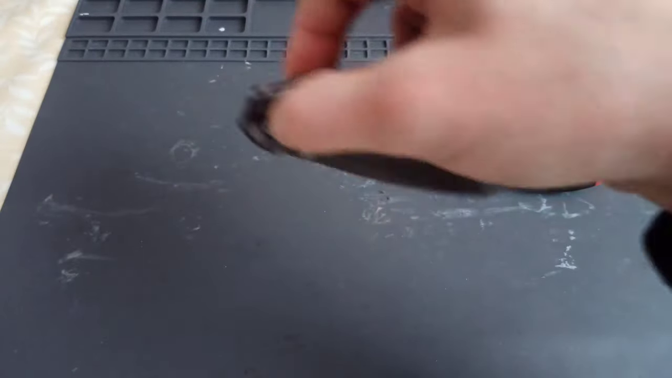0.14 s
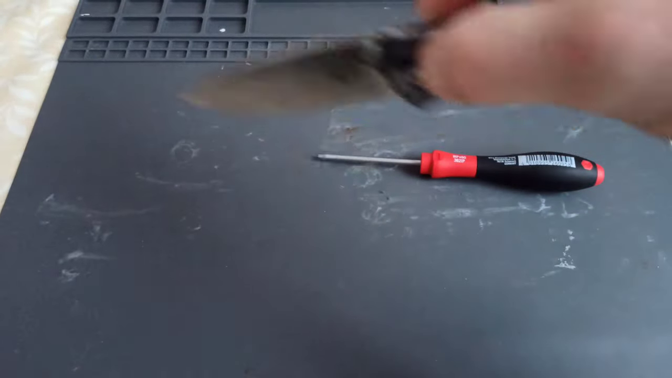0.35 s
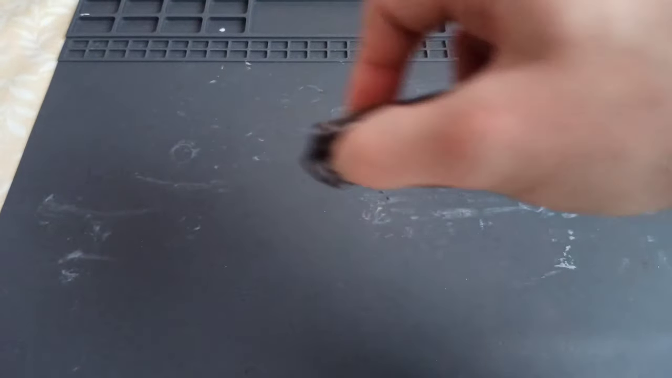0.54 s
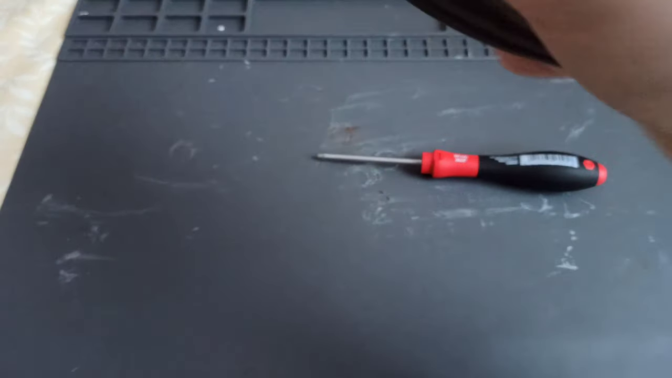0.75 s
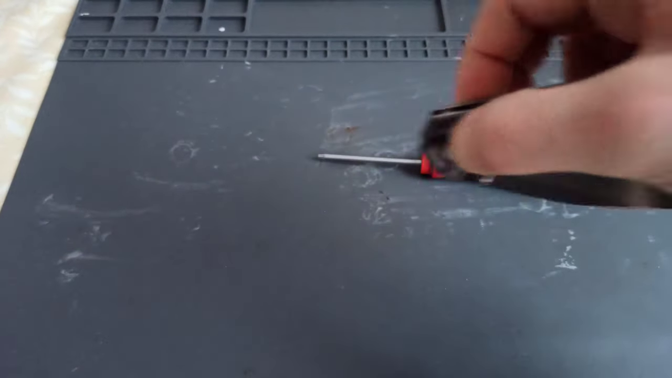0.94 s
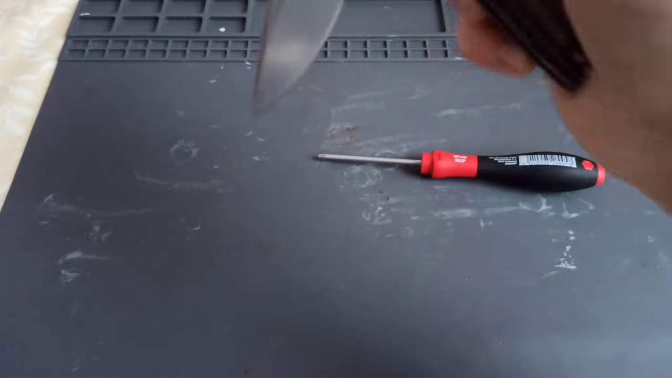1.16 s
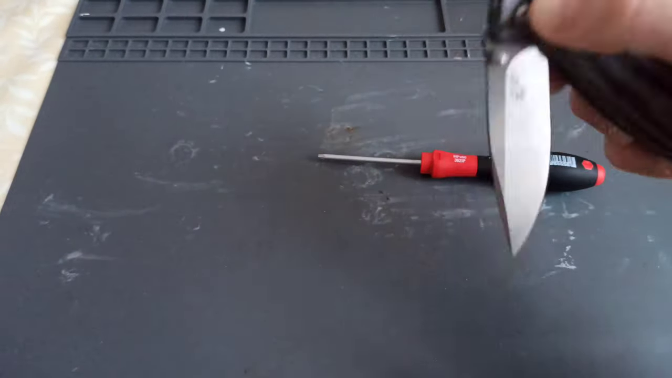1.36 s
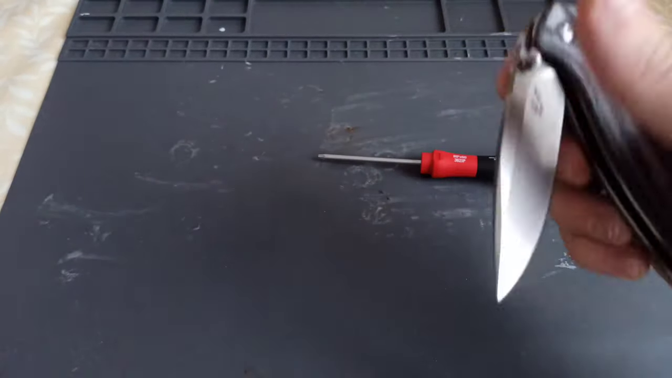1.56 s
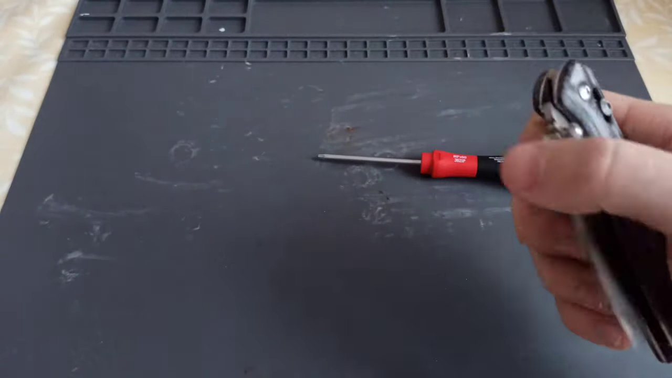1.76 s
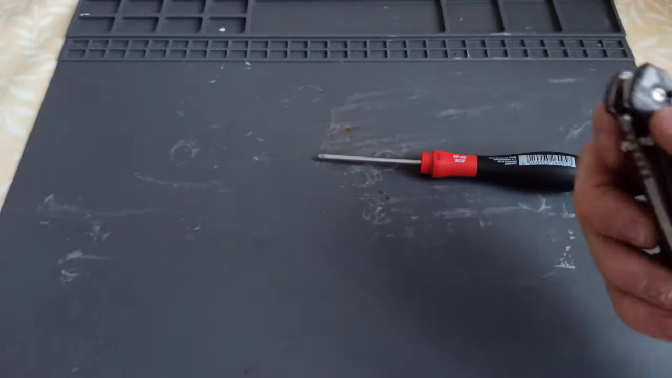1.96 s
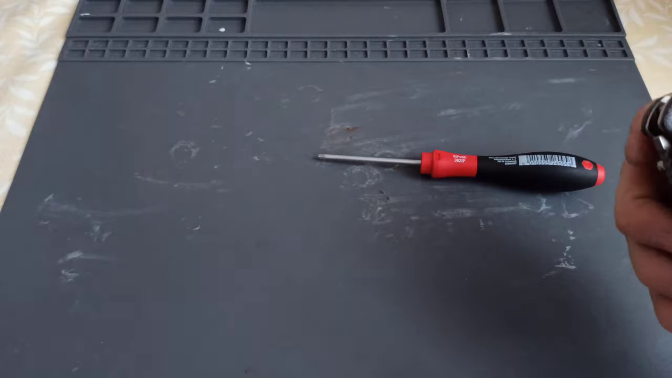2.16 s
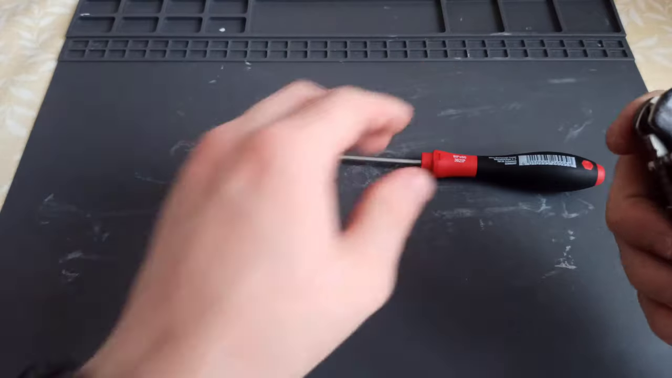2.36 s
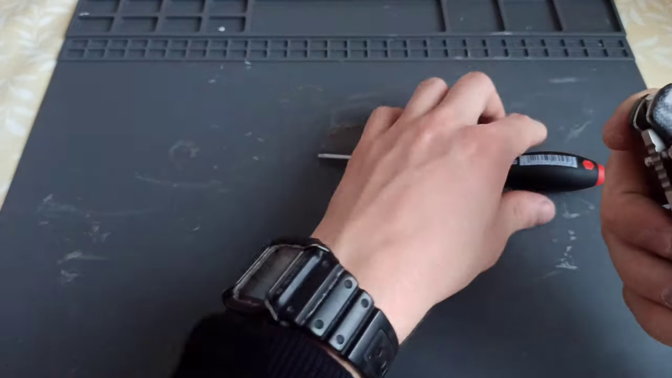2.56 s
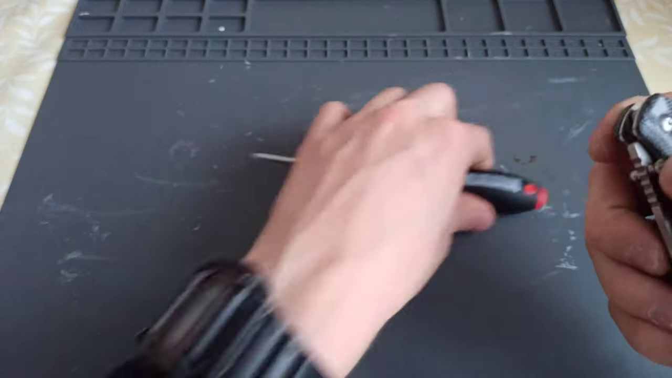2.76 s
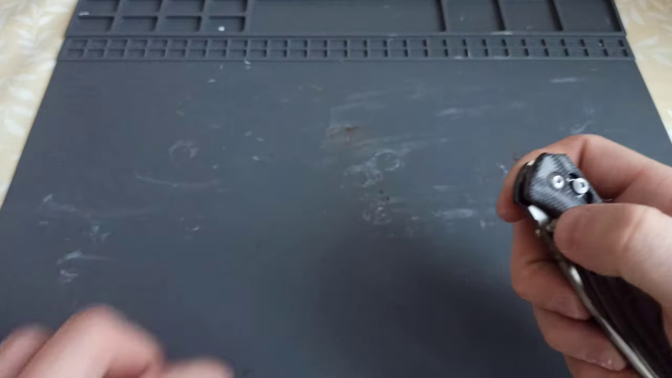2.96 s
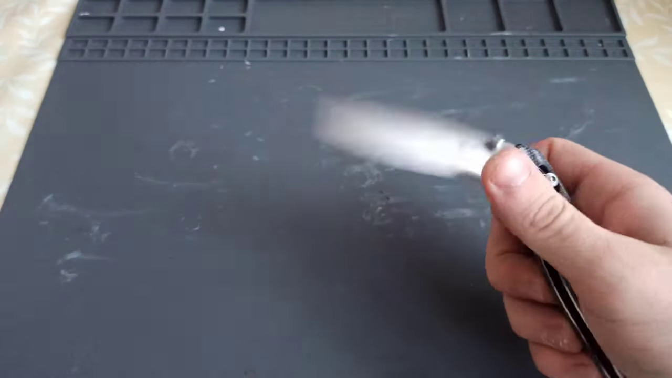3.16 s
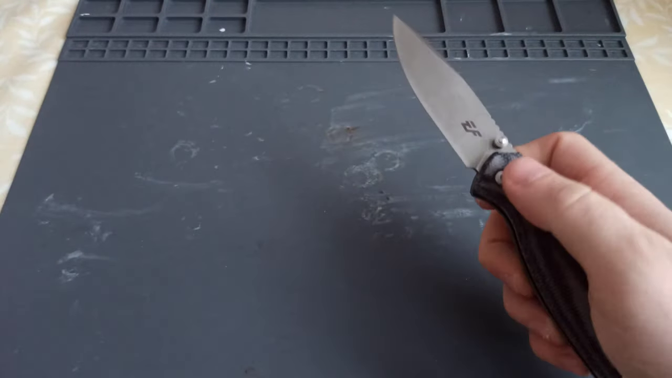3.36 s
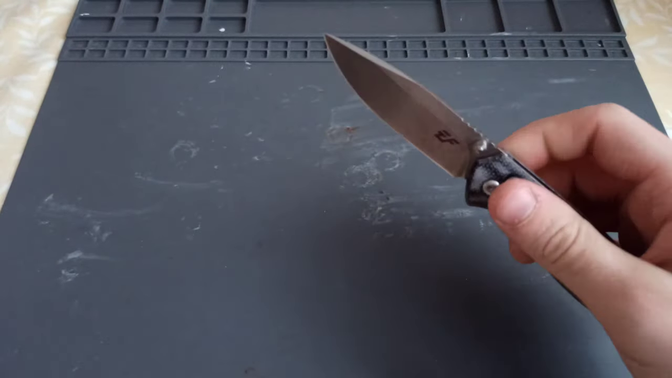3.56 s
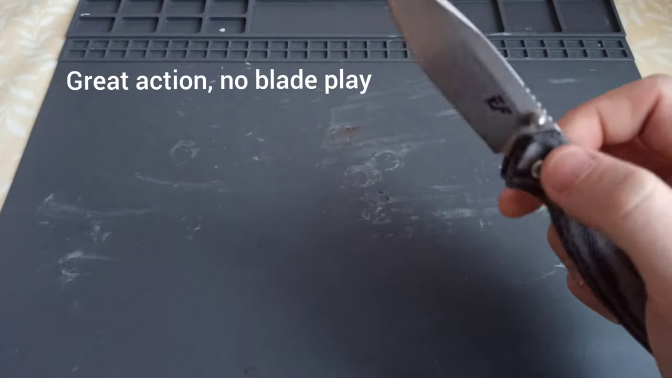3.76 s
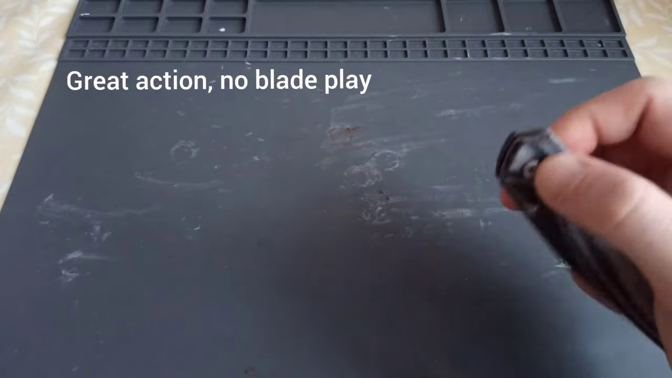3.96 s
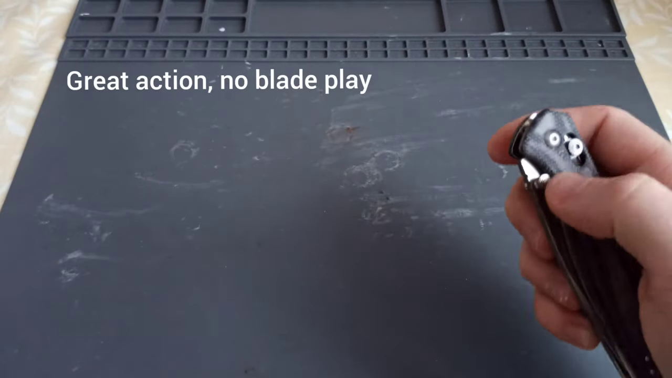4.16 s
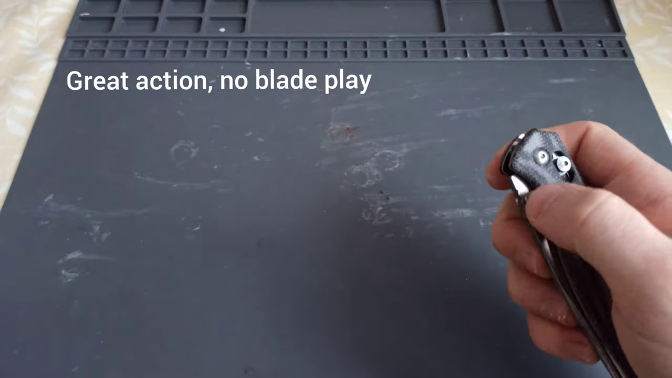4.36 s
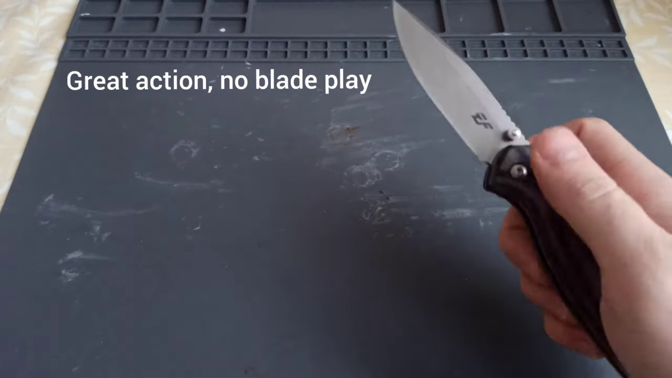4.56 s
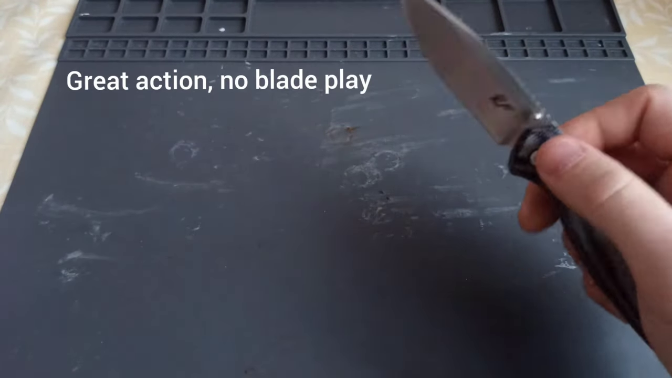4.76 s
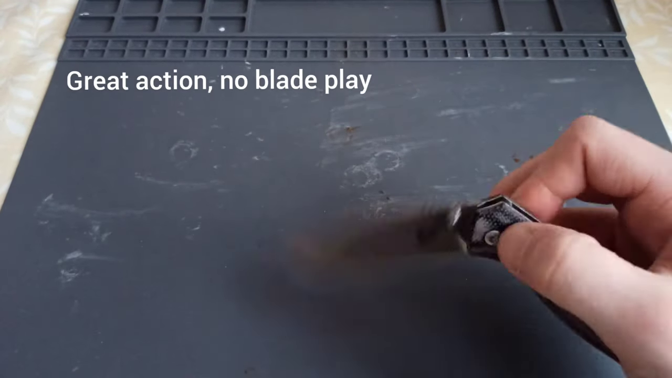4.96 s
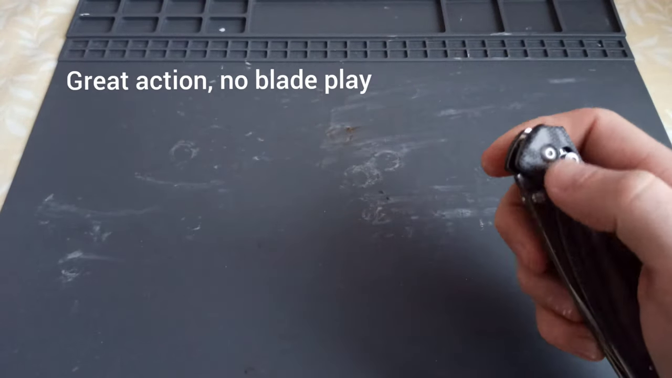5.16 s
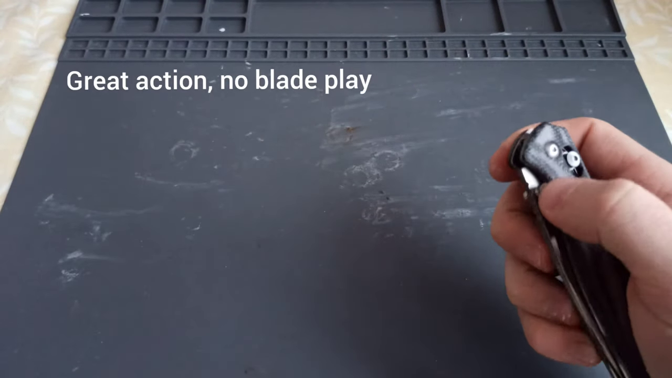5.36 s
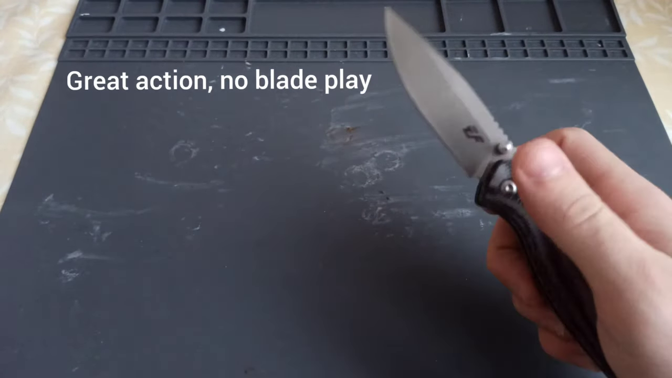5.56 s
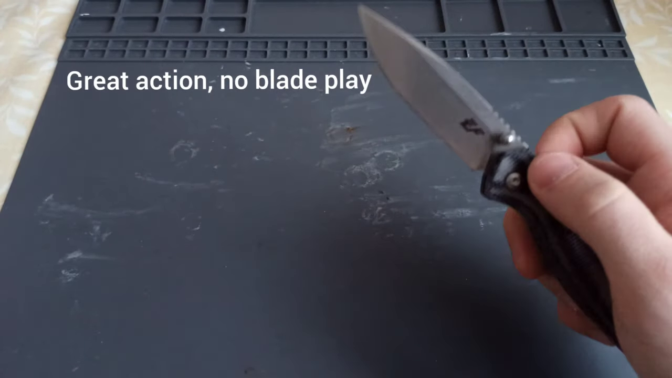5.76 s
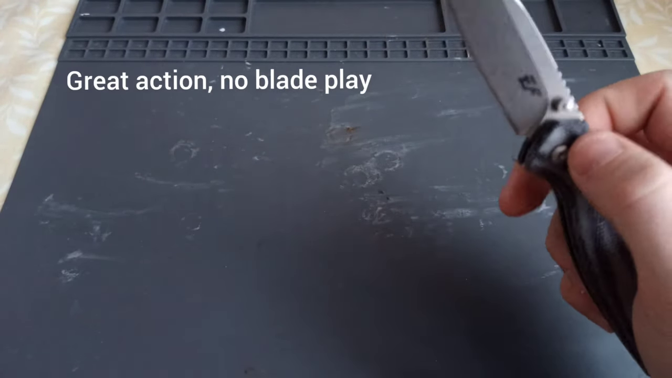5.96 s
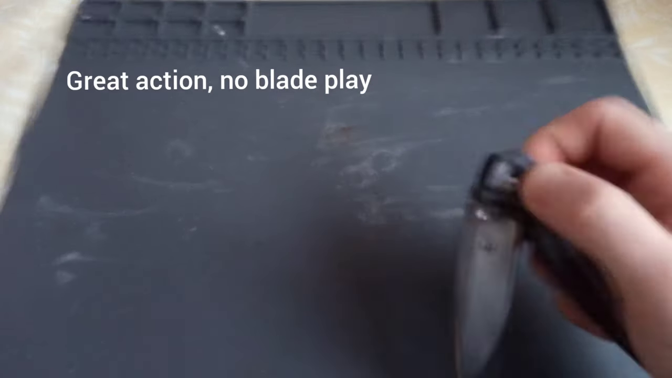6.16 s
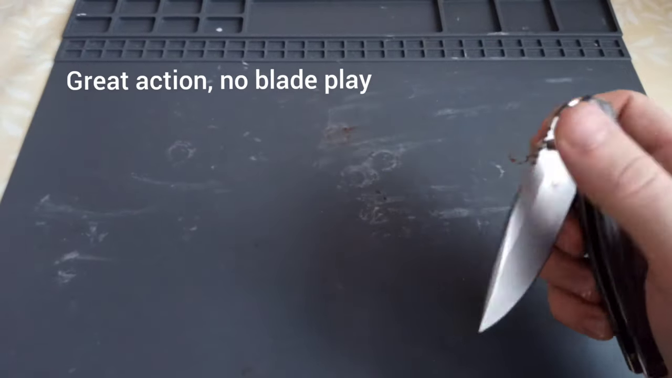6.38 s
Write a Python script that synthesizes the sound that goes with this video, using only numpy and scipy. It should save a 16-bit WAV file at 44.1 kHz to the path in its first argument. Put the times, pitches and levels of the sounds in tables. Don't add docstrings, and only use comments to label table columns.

```python
import sys
import numpy as np
from scipy import signal
from scipy.fft import rfft, irfft
from scipy.io import wavfile
from scipy.ndimage import uniform_filter1d

SR = 44100
rng = np.random.default_rng(int(sys.argv[2]) if len(sys.argv) > 2 else 0)


def store_pcm(level_fs):
    pcm = np.round(np.clip(level_fs, -1, 1) * 32767).astype(np.int16)
    wavfile.write(sys.argv[1], SR, np.atleast_2d(pcm).T)


def voltage_ratio(decibels):
    exponent = np.asarray(decibels, float) / 20
    return 10 ** exponent


N = 283122


def evened(x):
    return x / np.sqrt(np.mean(x ** 2) + 1e-20)


def peaked(x):
    return x / abs(x).max()


def read(points, hz):
    f, value = np.transpose(points)
    return np.interp(np.log(hz + 1), np.log(f + 1), value)


def add(mix, start_s, sound):
    at = round(start_s * SR)
    sound = sound[max(-at, 0):]
    part = mix[max(at, 0):][:len(sound)]
    part += sound[:len(part)]


def coloured(x, points):
    gain = voltage_ratio(read(points, np.fft.rfftfreq(len(x), 1 / SR)))
    return irfft(rfft(x) * gain, len(x))


def resonate(x, hz, width_hz):
    b, a = signal.iirpeak(min(hz, .49 * SR), hz / width_hz, SR)
    return signal.lfilter(b, a, x)


def ring(modes, t, spread=.015):
    hz, db, t60_s = np.transpose(modes)[:, :, None]
    hz = hz * (1 + spread * rng.uniform(-0.49, 1, hz.shape))
    decay = voltage_ratio(db - 60 * t / np.maximum(t60_s, .003))
    return (decay * np.sin(2 * np.pi * hz * t)).sum(0)


# mode in Hz, level in dB, t60 in s.
STEEL_MODES = [(4355, -9, .01), (5173, -6, .008), (5755, -6, .01), (6260, -2, .018), (6800, -6, .01),
               (7520, -3, .018), (8130, -8, .01)]
# mode in Hz, level in dB, t60 in s.
CLOSED_HANDLE_MODES = [(280, -15, .012), (870, -1, .024), (2030, -4, .024)]
# mode in Hz, level in dB, t60 in s.
OPEN_HANDLE_MODES = [(880, -2, .022), (1030, -2, .016), (1280, 0.5, 0.014), (1615, -19, .07),
                     (1700, -4, .012)]
# mode in Hz, level in dB, t60 in s.
BLADE_MODES = [(2370, -15, 0.0034), (3200, -5.5, 0.0053), (3740, 0, 0.024)]


def click(peak_db, lock_hz, handle_db, blade_db, sizzle_db, contact_s, lock_ring_db, wet_db,
          out=0, rattle_db=-40, clack_hz=4370, blade_ring_db=-4):
    t = np.arange(4000) / SR
    ragged = rng.standard_normal(len(t)) * (t / contact_s) * np.exp(-t / contact_s)
    blows = np.array([ragged, np.linalg.norm(ragged) * (t == 0)])

    def struck(modes):
        return signal.fftconvolve(blows, modes[None], axes=1)[:, :len(t)]

    out = np.clip(out, 0, 1)
    closed_knock = ring(CLOSED_HANDLE_MODES, t, spread=0.04)
    handle = (1 - out) * closed_knock + out * ring(OPEN_HANDLE_MODES, t, spread=0.026)
    parts = [(0, resonate(resonate(blows, lock_hz, 1500), lock_hz, 4500)),
             (lock_ring_db, struck(ring(STEEL_MODES, t))),
             (blade_db + blade_ring_db, struck(ring(BLADE_MODES, t, spread=0.12))),
             (blade_db, resonate(resonate(blows, clack_hz, 4700), clack_hz, 4600)),
             (handle_db + 5.5, np.array([handle, handle]) * np.minimum(t / 0.003, 1)),
             (sizzle_db + 4, resonate(resonate(blows, 10000, 4900), 13000, 8000))]
    direct, sent = sum(voltage_ratio(db) * part / np.linalg.norm(part, axis=1)[:, None] for db, part in parts)
    sent = sent - .7 * resonate(sent, 870, 300)
    b, a = signal.butter(1, 250, "high", fs=SR)
    direct, sent = signal.lfilter(b, a, [direct, sent])
    sent = sent - 0.4 * resonate(sent, 990, 2200)

    hits = rng.standard_normal(len(t)) * (rng.random(len(t)) < 900 / SR)
    chatter = hits * np.exp(-((t - .03) / 0.053) ** 2) * np.cos(np.pi / 2 * t / t[-1])
    chatter *= voltage_ratio(rattle_db) / np.linalg.norm(chatter)
    sound = room(direct, wet_db, sent)
    add(sound, 0, signal.fftconvolve(chatter, sent))
    return voltage_ratio(peak_db - 1.0) / abs(direct).max() * sound


# start in seconds, blow in dB, brightest ring in Hz, blade clack in dB, sizzle in dB.
SHAKES = [
    (0.3747, -12, 6350, -10, -10.5),
    (0.8186, -12, 8090, -9, -17.5),
    (0.9764, -9.5, 6170, -11.5, -11.5),
]
# start in seconds, blow in dB, brightest ring in Hz, blade clack in dB, sizzle in dB.
OPENS = [
    (3.255, -7, 6430, -11.5, -28),
    (4.5444, -9, 7000, -10, -19),
    (5.5578, -9, 6380, -6.5, -30),
]
# start in seconds, blow in dB, brightest ring in Hz, blade clack in dB, sizzle in dB.
SHUTS = [
    (1.8456, -10, 6600, -32.5, -32),
    (4.0143, -10.5, 7340, -23, -48),
    (5.1135, -12.5, 6850, -28.5, -25),
]


def snaps(mix):
    shake = dict(handle_db=-26, wet_db=-10, out=-6.8, rattle_db=-25, contact_s=.001,
                 clack_hz=3500, blade_ring_db=-10.5, lock_ring_db=-1.5)
    opened = dict(handle_db=-16, wet_db=-4.5, out=2, rattle_db=-18.5, contact_s=.001, lock_ring_db=-2)
    shut = dict(handle_db=-19.5, wet_db=-9.5, out=0.08, rattle_db=-18.5, contact_s=.00145, lock_ring_db=-2)
    for rows, grip in [(SHAKES, shake), (OPENS, opened), (SHUTS, shut)]:
        for s, db, hz, blade_db, sizzle_db in rows:
            add(mix, s, click(db, hz, blade_db=blade_db, sizzle_db=sizzle_db, **grip))


# start in seconds, blow in dB, blade clack in dB.
BOUNCES = [
    (1.8607, -13.5, -0.5),
    (1.87, -21, 1.5),
    (4.0438, -23, -16),
    (4.047, -35, -19),
    (5.5632, -50.5, -2),
]


def bounces(mix):
    for s, db, blade_db in BOUNCES:
        add(mix, s, click(db, 6500, -19.5, blade_db, -19.5, contact_s=0.0011, lock_ring_db=-11, wet_db=-11))


# start in seconds, blow in dB, brightest ring in Hz, blade clack in dB, sizzle in dB.
TICKS = [(0.2875, -46, 7160, -28, -9.5), (0.6561, -23.5, 6570, -18, -5), (2.025, -31.5, 7630, -37, -9),
         (3.1803, -36.5, 6150, 4.5, -17), (3.9336, -29, 6850, -43, -21), (3.9922, -20.5, 7100, -47.5, -11),
         (4.4745, -32, 7000, -1.5, -18), (4.956, -24, 5740, -34.5, -39), (5.009, -33.5, 6730, -8.5, -38),
         (5.0479, -36, 7900, -12.5, -31), (5.0789, -34, 6160, -10, -15), (5.4753, -28.5, 6540, 0.5, -19),
         (6.06, -26.5, 6600, -12.5, -42), (6.12, -42, 7500, -15, -18), (6.1709, -14, 7610, -14.5, -9.5)]


def ticks(mix):
    for s, db, hz, blade_db, sizzle_db in TICKS:
        add(mix, s, click(db, hz, -39.5, blade_db, sizzle_db, contact_s=.0006, lock_ring_db=-8.5, wet_db=-9.5))


# start in seconds, blow in dB, blade clack in dB.
EARLIER = [
    (-0.057, -16.5, -3),
]
# start in seconds, blow in dB, blade clack in dB.
FIDGETS = [(0.0746, -52, -6), (1.211, -55, -8), (1.242, -43.5, -34), (1.2599, -56, -21), (1.4385, -56, -14),
           (1.6416, -54, -5), (2.0355, -43, -3), (3.838, -54, -11.5), (3.884, -50, -23), (4.2471, -60, 1),
           (4.292, -61, -3.5), (4.44, -57, 3), (6.205, -35.5, 2.5)]
# start in seconds, blow in dB, blade clack in dB.
LEADS = [(.652, -31, -47), (.9537, -33.5, -3.5), (1.837, -24, -14), (3.175, -57.5, 9), (3.9185, -51.5, 0),
         (3.93, -40, -35), (4.009, -28, -10), (4.9447, -46, 1), (5.108, -22, -15), (5.462, -40, 7),
         (5.4697, -29.5, -1), (6.0432, -43, -2)]


def light_touches(mix):
    for rows, lock_hz, handle_db, sizzle_db in [(EARLIER, 6900, -17.5, -28.5), (FIDGETS, 6900, -17.5, -28.5),
                                                (LEADS, 7130, -33, -22.5)]:
        for s, db, blade_db in rows:
            add(mix, s, click(db, lock_hz, handle_db, blade_db, sizzle_db,
                              contact_s=.0006, lock_ring_db=-20, wet_db=-5.5))


# start in seconds, length in seconds, first squeal in dB, top squeal in dB.
PIVOTINGS = [
    (3.184, 0.08, -53, -41.5),
    (4.476, 0.074, -56.5, -41),
    (5.481, 0.09, -38.5, -43),
]
# centre in Hz, width in Hz, level in dB.
PIVOT_SQUEAL = [(2400, 160, 2), (3250, 420, 3), (3830, 1800, -1.5)]
# centre in Hz, width in Hz, level in dB.
PIVOT_HISS = [(6600, 800, 0.5), (7660, 850, -1), (13500, 3000, -10.5)]


def pivotings(mix):
    rise_s, fall_db_per_s = .019, 499
    ramp_s, ramp_db = 0.014, 7
    for s, length_s, first_db, top_db in PIVOTINGS:
        t = np.arange(0, length_s, 1 / SR)
        ramp_at_s = length_s - ramp_s
        low_db = top_db - fall_db_per_s * (ramp_at_s - rise_s)
        squeal_db = np.interp(t, [0, rise_s, ramp_at_s, length_s], [first_db, top_db, low_db, low_db + ramp_db])
        hiss_db = np.interp(t, [rise_s, length_s], [-5, 9])
        grain_db = 3.5 * evened(uniform_filter1d(rng.standard_normal(len(t)), 45))
        rub = rng.standard_normal(len(t)) * voltage_ratio(grain_db)
        squeal = sum(voltage_ratio(db) * evened(resonate(resonate(rub, hz, width_hz), hz, 3 * width_hz))
                     for hz, width_hz, db in PIVOT_SQUEAL)
        hiss = sum(voltage_ratio(db) * evened(resonate(rub, hz, width_hz)) for hz, width_hz, db in PIVOT_HISS)
        sound = voltage_ratio(squeal_db) * (evened(squeal) + voltage_ratio(hiss_db + 0.5) * evened(hiss))
        add(mix, s, room(sound * signal.windows.tukey(len(t), .15), -13.5))


# start in seconds, level in dB, pitch in Hz, length in seconds.
SQUEAKS = [
    (3.931, -53, 2330, .013),
    (5.078, -59, 2300, .03),
]


def squeaks(mix):
    for s, db, hz, length_s in SQUEAKS:
        noise = rng.standard_normal(round(length_s * SR))
        rub = resonate(resonate(noise, hz, 300), hz, 500)
        add(mix, s, voltage_ratio(db) * room(evened(rub) * signal.windows.tukey(len(rub), .6), -12))


# frequency in Hz, level in dB.
DULL_COLOUR = [(1200, -20.5), (2200, -2.5), (3200, -4), (4500, -17), (8000, -34.5)]


def rubbing(strokes, colour, grain_db, soft):
    grain = voltage_ratio(grain_db * evened(uniform_filter1d(rng.standard_normal(N), 200)))
    fits = voltage_ratio(0.83 * evened(uniform_filter1d(rng.standard_normal(N), 1800)))
    noise = evened(fits * grain) * rng.standard_normal((2, N))
    bright = evened(coloured(noise[0], colour))
    dull = evened(coloured(noise[1], DULL_COLOUR))
    bright_level, dull_level = np.zeros((2, N))
    for s, length_s, db, dull_db in strokes:
        swell = voltage_ratio(db) * signal.windows.tukey(round(length_s * SR), soft)
        add(bright_level, s, swell)
        add(dull_level, s, voltage_ratio(dull_db) * swell)
    return bright_level * bright + dull_level * dull


# start in seconds, length in seconds, level in dB, duller rub in dB.
FINGER_STROKES = [(.075, 0.013, -59, -12), (.09, 0.14, -78, -15), (.27, .1, -70, -19),
                  (1.14, 0.14, -69.5, -3), (1.23, 0.19, -63.5, -28), (1.43, .18, -65, -29),
                  (1.56, 0.24, -64.5, -0.5), (1.77, 0.16, -60, 1), (2.18, 0.12, -64.5, -9),
                  (2.3, 0.31, -76.5, -7.5), (2.63, .22, -71, -7), (2.89, 0.27, -74.5, -7.5),
                  (3.14, 0.057, -66.5, 4.5), (3.42, 0.18, -65, -16), (3.63, 0.13, -70.5, -20.5),
                  (3.82, 0.097, -62.5, -14), (4.19, 0.22, -67, 4.5), (4.4, 0.17, -69, 7.5),
                  (4.79, 0.086, -82, -12), (4.925, 0.021, -68, -9), (5.45, 0.012, -74, -4),
                  (5.815, 0.048, -67.5, -15), (6.036, 0.016, -70, -7)]
# frequency in Hz, level in dB.
RUSTLE_COLOUR = [(1500, -14), (2500, -31), (4000, 1.5), (5300, -8.5), (6800, 6), (9000, -2.5),
                 (15000, -16.5)]


def finger_rustle():
    return voltage_ratio(-7.0) * rubbing(FINGER_STROKES, RUSTLE_COLOUR, 3.3, soft=.6)


# start in seconds, length in seconds, level in dB, duller rub in dB.
DRAG_STROKES = [
    (2.42, 0.21, -66, -17.5),
    (2.54, 0.16, -62, -13),
    (2.62, 0.22, -69, -12),
]


def screwdriver_drag():
    colour_hz_db = [(150, -13.5), (300, 11.5), (800, 4.0), (1600, -1.5), (2500, -31)]
    return rubbing(DRAG_STROKES, colour_hz_db, 1.32, soft=0.65)


# start in seconds, level in dB, hardness in dB.
KNOCKS = [
    (2.592, -39, -28),
    (2.621, -48.5, -30),
    (2.718, -45, -38.5),
    (3.192, -51, -11),
    (5.152, -53, -3),
    (6.173, -29.5, 5.5),
]
# mode in Hz, level in dB, t60 in s.
DESK_MODES = [(124, -14, 0.33), (215, -2, .04), (285, -2, .045), (345, -10, 0.24), (388, -11, .17),
              (488, -3, 0.26), (518, -6, .16), (558, -9, .15), (705, -19, 0.12)]


def knocks(mix):
    push_hz, push_s = 126, .024
    t = np.arange(14000) / SR
    for s, db, hard_db in KNOCKS:
        burst = rng.standard_normal(len(t)) * np.exp(-t / 0.003)
        slap = peaked(resonate(resonate(burst, 1500, 1600), 1500, 1600))
        thump = peaked(resonate(resonate(1. * (t == 0), 400, 360), 330, 740))
        hard = ring(DESK_MODES[1:], t, spread=0) * np.minimum(t / 0.0036, 1)
        hard = hard + voltage_ratio(-3) * slap - voltage_ratio(8.5) * thump
        push_ramp = np.minimum(t / push_s, 1)
        push = np.sin(2 * np.pi * push_hz * t) * np.sin(np.pi * push_ramp)
        sound = push + ring(DESK_MODES[:1], t, spread=0) * push_ramp + voltage_ratio(hard_db) * hard
        add(mix, s, voltage_ratio(db) * room(sound, -15))


# frequency in Hz, t60 in s.
ROOM_T60 = [(120, 0.57), (400, 0.43), (1000, 0.34), (3000, 0.27), (6500, 0.24), (13000, .17)]
# delay in seconds, level in dB.
ECHOES = [
    (.0035, -12.5),
    (.0095, -17),
    (.021, -18.5),
]


def room(x, wet_db, sent=None):
    taps = np.zeros(21000)
    at = np.arange(100, len(taps) - 20, 20)
    taps[at + rng.integers(0, 20, len(at))] = rng.choice([-1., 1.], len(at))
    hz, t, z = signal.stft(taps, SR, nperseg=256)
    decay = voltage_ratio(-60 * t / read(ROOM_T60, hz)[:, None])
    tail = signal.istft(z * decay, SR, nperseg=256)[1]
    tail *= 1 - np.exp(-np.arange(len(tail)) / SR / .012)
    tail *= voltage_ratio(wet_db) / np.linalg.norm(tail)
    sound = signal.fftconvolve(x if sent is None else sent, tail)
    add(sound, 0.00071, voltage_ratio(0.0021) * x)
    for delay_s, db in ECHOES:
        add(sound, delay_s, voltage_ratio(db) * x)
    return sound


# frequency in Hz, level in dB per Hz.
AIR_COLOUR = [(30, -8.5), (60, 2), (110, 4.5), (200, 2.5), (500, -4), (1000, -9.5), (2500, -18),
              (4600, -24.5), (5400, -32), (6300, -24), (15000, -28.5)]


def air():
    swell = evened(uniform_filter1d(uniform_filter1d(rng.standard_normal(N), 4000), 4000))
    return voltage_ratio(-63.5 + 0.11 * swell) * evened(coloured(rng.standard_normal(N), AIR_COLOUR))


def scene():
    mix = air() + screwdriver_drag() + finger_rustle()
    for source in [snaps, bounces, ticks, light_touches, pivotings, squeaks, knocks]:
        source(mix)
    return mix[None]


def top_cut(x):
    return signal.sosfilt(signal.butter(12, 16470, fs=SR, output="sos"), x)


# frequency in Hz, gain in dB.
MIC_RESPONSE = [(30, -16), (90, -0.5), (2500, -2.5), (4500, 3.5), (5500, 1.1), (6500, 2.5), (8400, -3),
                (8800, -11), (11300, -14.5), (11700, 1.5), (15400, 6), (15800, -17.5), (16400, -28.5),
                (16600, -65)]
# centre in Hz, level in dB, t60 in s.
SMEAR_BANDS = [(4800, -12, .03), (6200, 0, .03), (6850, -2, .03), (7650, 0, .03), (8450, -5, .03),
               (11900, -3, .03)]


def record(dry):
    x = coloured(dry[0], MIC_RESPONSE)
    ahead = ring(SMEAR_BANDS, np.arange(600) / SR, spread=0)
    ahead *= voltage_ratio(-25.0) / np.linalg.norm(ahead)
    smear = signal.fftconvolve(x[::-1], ahead)[:N][::-1]
    mix = (x + smear)[None]
    return top_cut(mix)


dry = scene()
out = record(dry)
store_pcm(out)
```